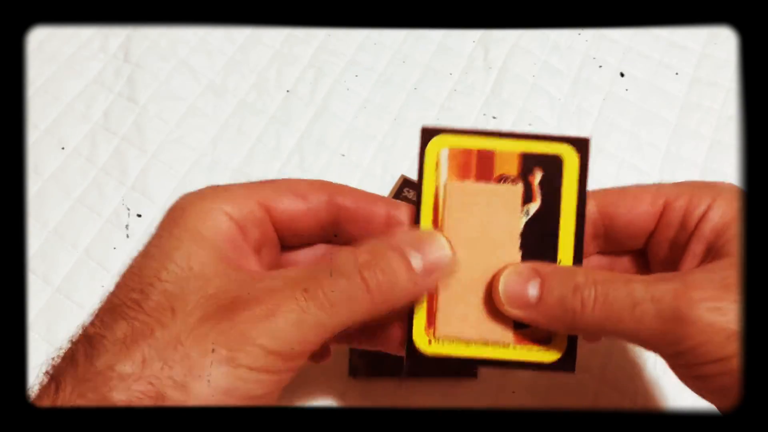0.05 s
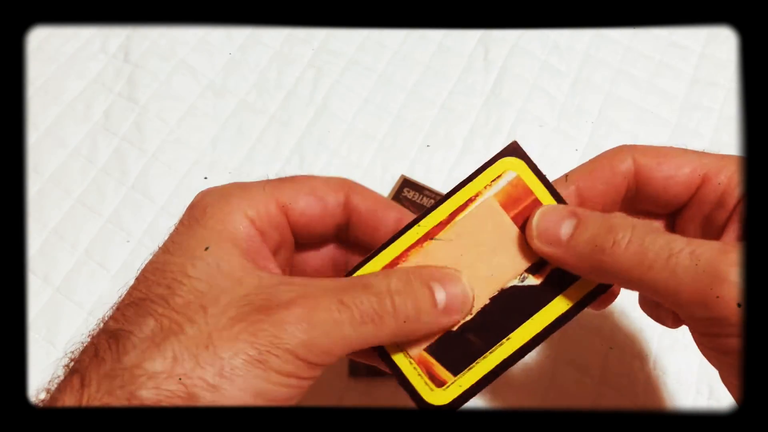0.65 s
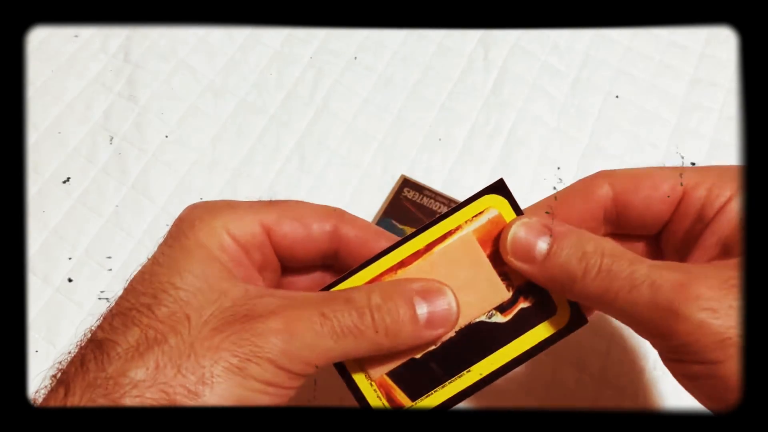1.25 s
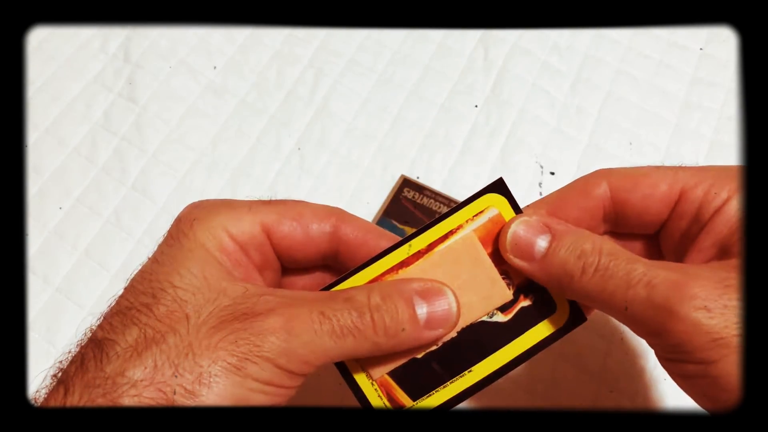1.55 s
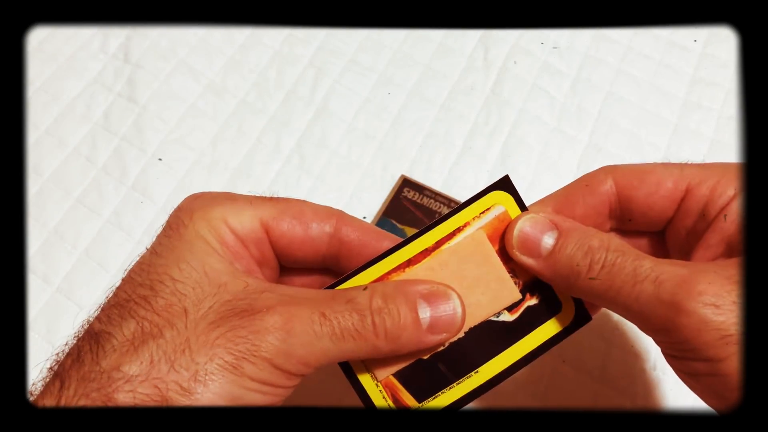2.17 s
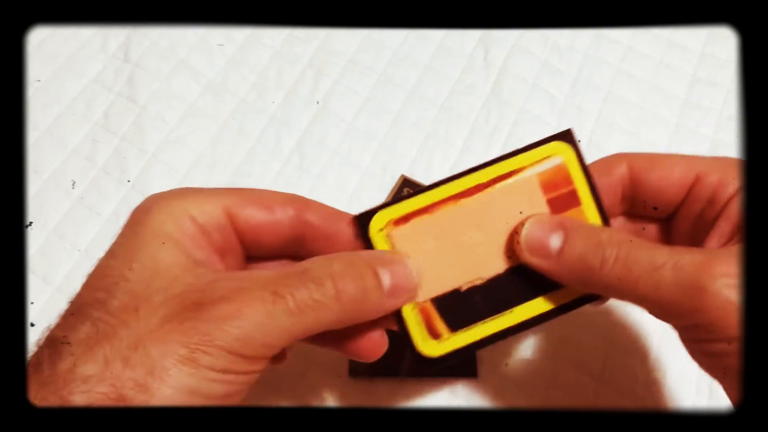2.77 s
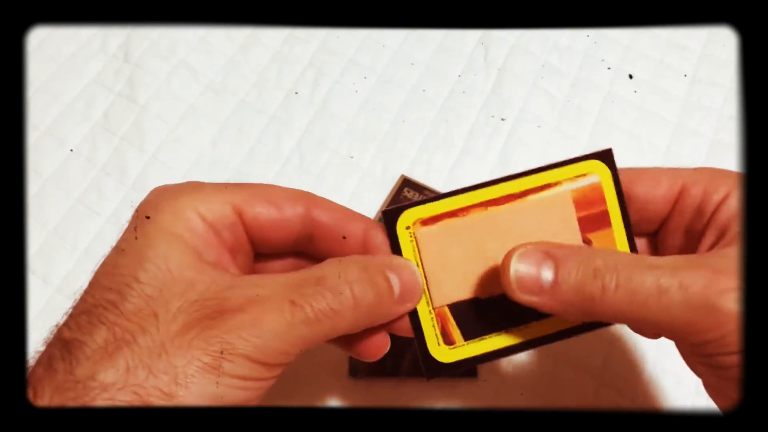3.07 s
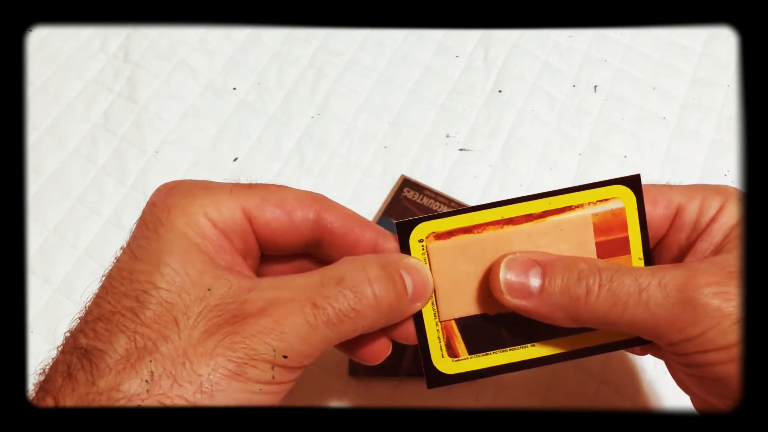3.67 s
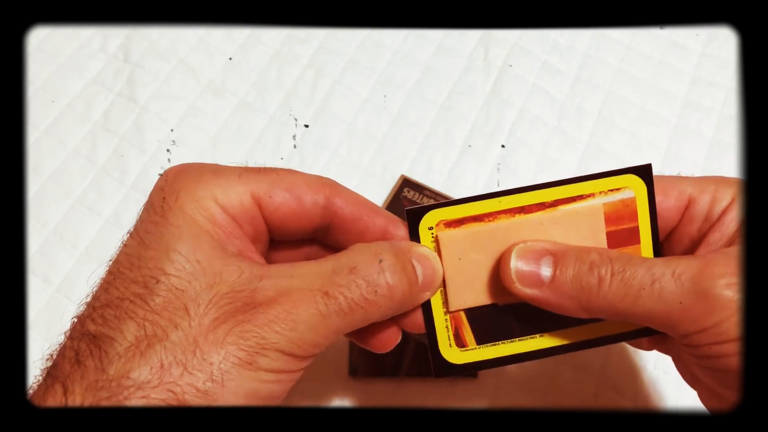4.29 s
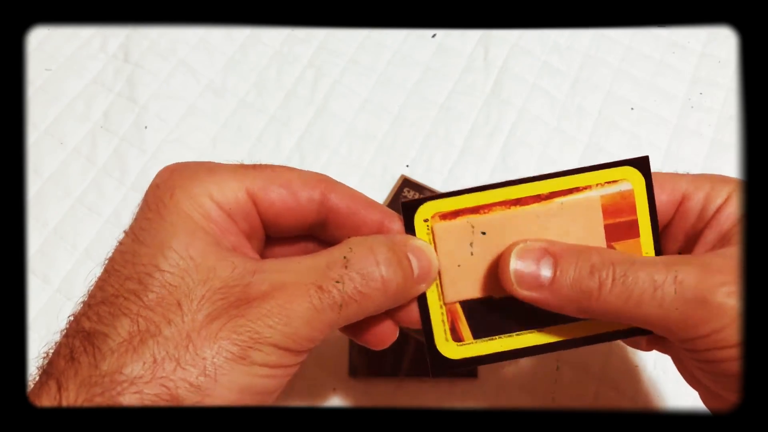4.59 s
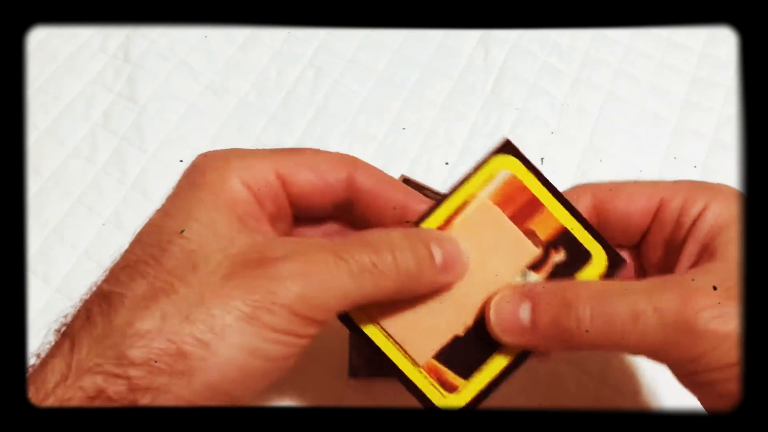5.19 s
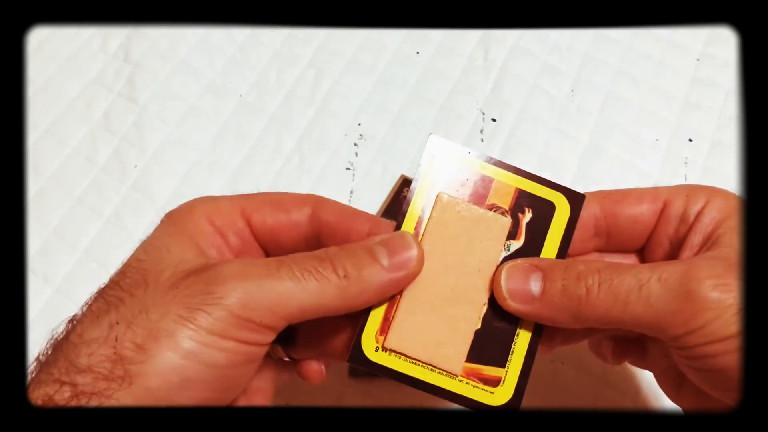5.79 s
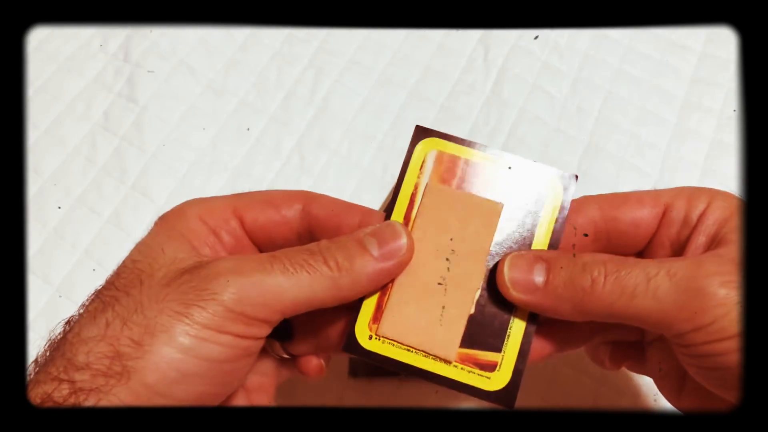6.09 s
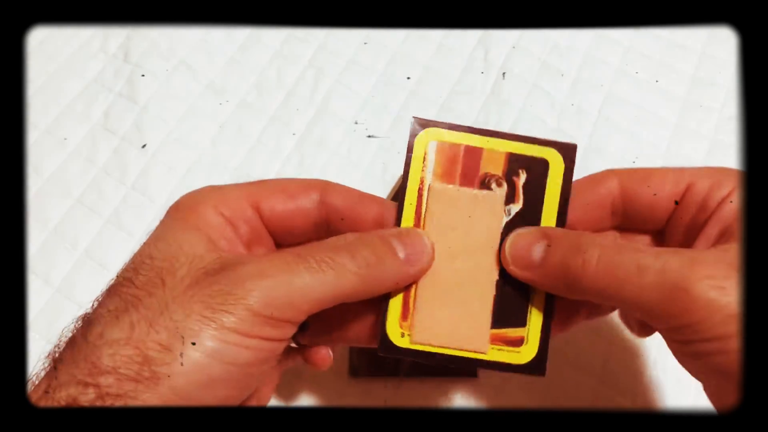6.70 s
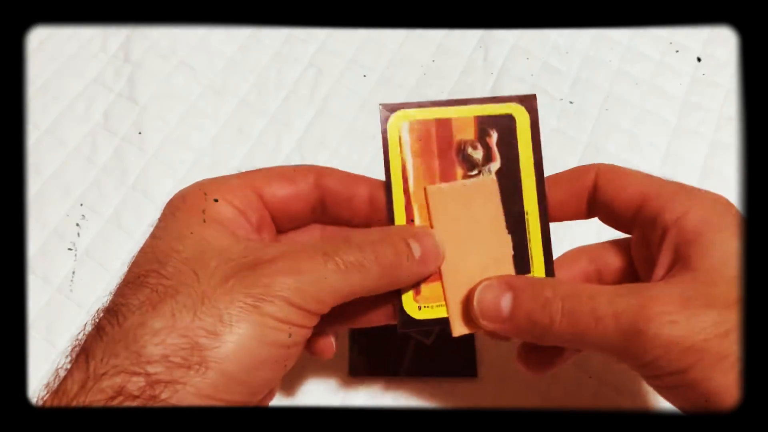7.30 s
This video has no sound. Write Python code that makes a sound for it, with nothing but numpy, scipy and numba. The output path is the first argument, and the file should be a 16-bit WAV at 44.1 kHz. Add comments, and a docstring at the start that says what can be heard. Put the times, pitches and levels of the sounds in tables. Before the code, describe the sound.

Hands work old gum loose from a stiff cardboard card, close to the microphone in a small, dry room. For the first second or so, fingers rub softly and card edges give light flicks. At 1.3 seconds comes a loud, brittle snap with a very brief ring, followed by more sharp cracks around 1.6 and 1.8 seconds. From 2 to 4 seconds there are quieter ticks and short scrapes, with a flick and rasp near 3.1. A second loud snap lands at 4 seconds. Fine crackling, clicks and dry sliding follow until about 5.5 seconds, with stronger clicks near 4.7 and 5.1. The handling then thins to tiny ticks, before soft rubbing and a few duller flicks return from 6.6 seconds to the end at about 7.5. Faint air noise and a low, wavering electrical hum lie underneath throughout.

```python
"""In a small, dry room, two hands close by bend a stiff cardboard card to work old gum loose.
The bond fails by brittle fracture, in ticks and a few loud snaps that excite the card's resonances;
a patch that comes free rings the gum like a plate. Sliding fingers rasp by stick-slip friction,
and card edges flick off them. Behind it lie faint air noise and mains hum beating against a motor."""
import sys
import numpy as np
from scipy import signal
from scipy.fft import rfft, irfft
from scipy.io import wavfile
from numba import njit

SR = 44100
rng = np.random.default_rng(int(sys.argv[2]) if len(sys.argv) > 2 else 0)


def transcribe(u):
    """Save the signal u as a 16-bit wav file named by the first command-line argument.

    u: samples, shape (n,) or (channels, n), limited to [-1, 1]; the rate is SR.
    q: integer samples, one column per channel.
    """
    v = np.clip(np.atleast_2d(u).T, -1, 1)
    q = np.round(v * 32767).astype(np.int16)
    wavfile.write(sys.argv[1], SR, q)


N = 328545

T = np.arange(N) / SR


def undb(db):
    """Decibels to gain."""
    return 10 ** (np.asarray(db) / 20)


def unit(x):
    """Scale to rms 1."""
    return x / np.sqrt(np.mean(x ** 2))


def add(out, s, x):
    """Mix x into out from time s."""
    i = max(0, int(s * SR))
    out[i:i + len(x)] += x[:max(0, N - i)]


def colour(x, points):
    """Shape x by (Hz, dB) points; rms 1."""
    hz, db = np.transpose(points)
    f = np.maximum(np.fft.rfftfreq(len(x), 1 / SR), 1)
    return unit(irfft(rfft(x) * undb(np.interp(np.log(f), np.log(hz), db)), len(x)))


def walk(rate):
    """Smooth random wander with a spread near 1."""
    knots = rng.standard_normal(int(N / SR * rate) + 2)
    return np.interp(T * rate, np.arange(len(knots)), knots)


def damping(t, t60):
    """Exponential decay: 60 dB down after t60 seconds."""
    return np.exp(-np.log(1000) * t / t60)


def flat_filter(x, hz, kind, order=2):
    """Maximally flat low-, high- or band-pass filtering."""
    return signal.sosfilt(signal.butter(order, hz, kind, fs=SR, output="sos"), x)


def band_lift(x, hz, width_hz, lift_db):
    """Second-order resonance: added to x, it lifts or cuts the band at hz."""
    b, a = signal.iirpeak(hz, hz / width_hz, fs=SR)
    return (undb(lift_db) - 1) * signal.lfilter(b, a, x)


@njit
def resonate(x, hz, q):
    """State-variable band-pass with a moving centre, gain 1 there."""
    y, b, l = np.empty(len(x)), 0., 0.
    for i in range(len(x)):
        g = np.tan(np.pi * hz[i] / SR)
        v = (b + g * (x[i] - l)) / (1 + g * (g + 1 / q))
        b, l, y[i] = 2 * v - b, l + 2 * g * v, v / q
    return y


# Spectrum of the room air. Each row: frequency in Hz, relative density in dB.
AIR_SPECTRUM = [(25, -19.5), (45, -6.5), (80, 0), (150, 2.5), (250, -1), (500, -7), (1000, -14.5),
                (2000, -23), (4000, -25.5), (8000, -27.5), (15600, -31.5), (16500, -52.5)]

def air(level_db=-67):
    """Broadband ambient noise: a soft rumble and hiss whose level wavers slightly."""
    return colour(rng.standard_normal(N), AIR_SPECTRUM) * undb(level_db + .6 * walk(4.3))


# Course of the mains fundamental. Each row: time in seconds, level in dB.
MAINS_LEVELS = [(0, -77), (1.33, -69), (2.94, -73.5), (3.36, -81.5), (4.1, -70.5), (5.5, -74), (5.8, -77),
                (6.55, -88.5), (7.16, -70)]
# Faint hum tones and a thin electronic whine. Each row: frequency in Hz, mean level in dB.
STEADY_TONES = [(149, -82), (179.6, -86), (239.5, -81.5), (14655, -82)]

def hum(mains_hz=59.2, buzz_hz=120, motor_hz=118.26, buzz_db=-63, motor_db=-70.5, quiet_s=.47):
    """Beating: a motor runs just below the mains buzz, so their sum swells and sinks."""
    beat = tone(buzz_hz, buzz_db, quiet_s) - tone(motor_hz, motor_db, quiet_s)
    fundamental = tone(mains_hz, np.interp(T, *np.transpose(MAINS_LEVELS)))
    return beat + fundamental + sum(tone(hz, db + 1.5 * walk(8)) for hz, db in STEADY_TONES)


def tone(hz, db, zero_s=0):
    """A sine of the given rms level that crosses zero upwards at zero_s."""
    return np.sqrt(2) * undb(db) * np.sin(2 * np.pi * hz * (T - zero_s))


def room(x, wet_db=-22, gap_s=.0105, build_s=.0035, bright_t60=.15, dull_t60=.3):
    """Reverberation: near walls answer after a gap and absorb treble, so the lows last longest."""
    t = np.arange(SR // 3) / SR
    bright, dull = rng.standard_normal((2, len(t)))
    bright = flat_filter(bright, 13500, "low") * damping(t, bright_t60)
    dull = undb(-3) * flat_filter(dull, 2200, "low") * damping(t, dull_t60)
    tail = (bright + dull) * np.clip((t - gap_s) / build_s, 0, 1)
    return undb(wet_db) * signal.fftconvolve(x, tail / np.sqrt(np.sum(tail ** 2)))[:N]


# Finger strokes. Each row: start, attack and release in seconds, rasp level in dB,
# body and hiss in dB relative to the rasp.
FINGER_STROKES = [(0, 0.0032, 0.036, -59, -3.5, 6.5), (.16, 0.016, 0.047, -71.5, 2, 6),
                  (.19, 0.022, 0.28, -69.5, -9, -3.5), (0.351, 0.049, 0.11, -57, -9, -8.5),
                  (0.518, 0.028, 0.24, -60.5, -4.5, -11), (.63, 0.039, 0.17, -64, -18, -1),
                  (0.831, 0.034, 0.011, -64, -6, -5), (.91, 0.074, .04, -68.5, -12, -7),
                  (2.39, 0.042, 0.023, -66.5, -0.5, 3.5), (2.608, 0.0077, 0.034, -62.5, 5.5, -12),
                  (2.644, 0.015, 0.057, -66, -11, -4), (2.718, 0.023, 0.12, -66.5, -10, 5),
                  (2.74, 0.063, 0.027, -57.5, -9, -4), (2.88, 0.11, 0.17, -63.5, -7.5, -6),
                  (3.099, .018, 0.016, -48, -5.5, -8), (3.15, 0.014, .018, -55.5, -10, -5),
                  (3.2, 0.023, 0.021, -65.5, -6, -4), (3.53, 0.017, 0.068, -64, -1.5, -16),
                  (3.68, 0.015, 0.06, -64, -1, -7), (4.099, 0.036, 0.011, -58, 5, 4.5),
                  (4.682, 0.018, 0.019, -46, -10, -14), (4.769, 0.096, 0.017, -59.5, -4.5, -2),
                  (5.065, 0.043, 0.039, -60, -9, 2), (5.14, 0.034, 0.062, -53.5, -13, -3),
                  (5.23, 0.024, 0.018, -62.5, -8, -5), (5.32, .16, .03, -63, -9, 2),
                  (5.9, 0.16, 0.046, -69, -4, -5), (6.51, 0.058, .05, -79, 7, 3.5),
                  (6.63, 0.065, 0.1, -58, 0, -6), (6.73, 0.031, 0.08, -62, 2, -8),
                  (6.918, 0.08, 0.072, -63.5, -6, -1.5), (7.108, .012, 0.028, -62, 4.5, 2),
                  (7.134, 0.018, 0.21, -65, 5, -2.5), (7.25, 0.046, 0.15, -61, 5.5, -5),
                  (7.32, 0.045, 0.14, -56, 3, -5)]

def stroke_gains(speed_exponent=1.1, rest_db=(-86, -91, -92)):
    """Friction noise grows with speed: gains of body, rasp and hiss over the creep of resting fingers."""
    power = np.zeros((3, N))
    for start, attack, release, db, body_db, hiss_db in FINGER_STROKES:
        t = np.arange(int((attack + release) * SR)) / SR
        speed = np.interp(t, [0, attack, attack + release], [0, 1, 0])
        for part, part_db in zip(power, (body_db, 0, hiss_db)):
            add(part, start, (undb(db + part_db) * speed ** speed_exponent) ** 2)
    return np.sqrt(power + undb(rest_db)[:, None] ** 2)


# Low, middle and high friction spectra. Each row: frequency in Hz, relative level in dB.
BODY_SPECTRUM = [(150, -25.5), (350, -1.5), (650, 2.5), (1200, 3), (2000, -2), (2800, -19.5)]
RASP_SPECTRUM = [(1500, -28.5), (2300, 1.5), (3600, 2.5), (5500, 0.5), (6800, -5), (8500, -23.5)]
HISS_SPECTRUM = [(5500, -21.5), (7200, 1.5), (10000, 1.5), (14000, -3), (15500, 1), (16100, -34)]
# The two card resonances that the grip selects.
# Each row: time in seconds, lower and upper frequency in Hz, nominal lift in dB.
GRIP_RESONANCES = [(.22, 3300, 5400, 9), (.43, 3170, 5230, 3), (.6, 3280, 3900, 6),
                   (0.701, 4200, 5810, 6.5), (2.76, 3130, 5960, 7), (2.93, 2970, 5340, 11.5),
                   (3.04, 2820, 5340, 7.5), (3.1, 2960, 5100, 1.5), (4.85, 3770, 4737, 9.5),
                   (5.18, 3520, 4280, 2), (6.7, 2660, 3550, 6), (7, 3740, 5970, 6.5), (7.12, 720, 3420, 10),
                   (7.24, 750, 3540, 6), (7.29, 1570, 3280, 11), (7.44, 1700, 3160, 10)]

def rubbing(slips_per_s=3000, grain_db=6.5, judder_db=3, flicker_db=1.5, q=7.0):
    """Stick-slip friction: skin ridges catch and slip in micro-clicks, juddering with the pressure."""
    slips = (rng.random(N) < slips_per_s / SR) * rng.choice([-1, 1], N)
    sizes = undb(grain_db * np.minimum(rng.exponential(size=N), 5))
    friction = unit(slips * sizes) + rng.standard_normal(N)
    judder = judder_db * walk(90)
    rub = np.zeros(N)
    for spectrum, gain in zip((BODY_SPECTRUM, RASP_SPECTRUM, HISS_SPECTRUM), stroke_gains()):
        rub += colour(friction, spectrum) * gain * undb(judder + flicker_db * walk(70))
    grip_s, *columns = np.transpose(GRIP_RESONANCES)
    lower_hz, upper_hz, lift_db = (np.interp(T, grip_s, column) for column in columns)
    lower = (undb(lift_db) - 1) * resonate(rub, lower_hz, q)
    upper = (undb(lift_db + 1.5) - 1) * resonate(rub, upper_hz, q)
    # what goes into the resonances is missing from the rasp around them
    spent = .39 * resonate(rub, np.sqrt(lower_hz * upper_hz), .52)
    return rub - spent + .51 * (lower + upper)


# Resonances and dead spots of the held card. Each row: frequency in Hz, width in Hz, full lift in dB.
CARD_RESONANCES = [(716, 530, 6.5), (1230, 89, 2.5), (2120, 310, 7), (2930, 140, -11), (3260, 350, 2.5),
                   (4220, 410, 2), (5040, 710, 1.5), (6584, 310, 6.5), (8060, 270, -12), (10200, 900, 1),
                   (14700, 500, 6), (15160, 500, 6.5)]

def card(x, depth=1):
    """Forced vibration: the card imposes its peaks and dips on whatever shakes it."""
    return x + sum(band_lift(x, hz, width, db * depth) for hz, width, db in CARD_RESONANCES)


# Spells of crackle as the card bends.
# Each row: start and end in seconds, ticks per second, base level in dB.
CRACKLE_SPELLS = [(0.81, 1.024, 30, -72), (1.963, 2.041, 40, -59), (2.412, 2.463, 50, -51),
                  (3.049, 3.312, 30, -60.5), (3.487, 3.542, 40, -56.5), (3.817, 4.02, 20, -66.5),
                  (4.296, 4.43, 75, -49.5), (4.473, 4.591, 60, -50), (4.763, 4.896, 45, -50.5),
                  (5.237, 5.493, 30, -54.5), (5.944, 6.049, 40, -52.5), (6.539, 6.794, 35, -59),
                  (7.112, 7.442, 45, -60)]

def crackle(t60=.005, scatter_db=3):
    """Acoustic emission: tiny threads of the bond part in turn, each a short tick through the card."""
    out, t = np.zeros(N), np.arange(SR // 100) / SR
    for start, end, rate, db in CRACKLE_SPELLS:
        count = max(1, int((end - start) * rate))
        for k, (jitter, size) in enumerate(rng.random((count, 2))):
            tick = rng.standard_normal(len(t)) * damping(t, t60)
            gain = undb(db + scatter_db * (2.87 * size - .5))
            add(out, start + (end - start) * (k + jitter) / count, gain * tick)
    return card(flat_filter(out, 4000, "high"), depth=.69)


def flex(drive_db, hz=340, swell_s=.00091):
    """Damped oscillation: the whole card springs back and the fingers stop it within a few cycles."""
    t = np.arange(SR // 25) / SR
    share_db = -8 - .25 * abs(drive_db + 30)  # the share peaks for hard snaps, at a drive of -30 dB
    envelope = t / swell_s * np.exp(1 - t / swell_s)
    swing = undb(drive_db + share_db) * np.sin(2 * np.pi * hz * t) * envelope
    return flat_filter(swing, 170, "high")  # no deep rumble lingers below the spring


# Bands of a snap, from the card's body up to the sharp edge. Each row: lower and upper limit in Hz.
WAVE_BANDS = [(540, 1450), (1500, 3300), (3300, 5600), (5600, 8500), (8500, 16500)]

def snap(t60, levels_db, crack_t60=.00055, crack_db=5, bass_lag_s=.0005, kick_db=3):
    """Dispersion: a sudden release flexes the card; its slow, low bending waves come late and linger."""
    t = np.arange(SR // 25) / SR
    out = flex(levels_db[0])
    for (low_hz, high_hz), db in zip(WAVE_BANDS, levels_db):
        slowness = WAVE_BANDS[0][1] / high_hz
        age = t - bass_lag_s * slowness
        ring = damping(age, t60 * (1 + .99 * slowness))
        crack = undb(crack_db) * damping(age, crack_t60)
        shake = rng.choice([-1, 1], len(t)) * (age >= 0) * (ring + crack)
        # to long waves the whole release is a single kick
        shake[np.argmax(age >= 0)] += undb(kick_db) * np.sqrt(slowness * np.sum(shake ** 2))
        wave = card(flat_filter(shake, (low_hz, high_hz), "band", order=3))
        millisecond_rms = np.sqrt(np.sum(wave ** 2) / (SR / 1000))  # as if all energy fell in 1 ms
        out += undb(db) * wave / millisecond_rms
    return out


# Spectrum shared by all flicks. Each entry: relative level in dB in one of WAVE_BANDS.
FLICK_SPECTRUM = [-3, -1.5, 0.5, -5.5, 2.5]
# Edge flicks. Each row: start in seconds, base t60 in seconds, base level in dB, tilt in dB per band.
EDGE_FLICKS = [(.0045, 0.0043, -41, 0), (0.1855, 0.016, -48.5, -2.5), (.6509, 0.01, -46.5, 0),
               (0.7877, .024, -51.5, 0), (0.9835, .005, -58.5, 0.5), (1.0006, 0.011, -54.5, 0.5),
               (1.065, 0.0057, -45, -0.5), (1.1497, 0.0079, -47.5, 0), (1.175, .013, -48.5, 0.5),
               (2.4237, 0.024, -66, 4), (2.481, 0.0095, -61, 2), (2.6101, 0.027, -54.5, 0.5),
               (3.0765, .009, -56.5, 0), (3.1082, 0.037, -44.5, -0.5), (3.16, .017, -61, 0),
               (4.5696, 0.0075, -56, 0), (4.6248, 0.0044, -57.5, -0.5), (4.694, .025, -50.5, 0),
               (4.7, 0.039, -44.5, 0.5), (4.7271, .0058, -47, 2.5), (4.8384, 0.0085, -45.5, -1.5),
               (5.1494, 0.012, -43.5, 3.5), (5.1624, 0.0033, -52, 1.5), (5.31, 0.0065, -43, .5),
               (5.342, 0.025, -57, -4), (5.436, 0.012, -59, 0), (6.6322, 0.0078, -58.5, -0.5),
               (6.6625, 0.012, -56.5, -1), (6.7627, 0.044, -52, -5), (6.789, 0.015, -61, -6.5),
               (7.28, .015, -53.5, -2), (7.307, 0.015, -50, -2.5), (7.3755, .0057, -44.5, -3.5)]

def flicks(ping_hz=4600, ping_width_hz=800):
    """Plucking: a card edge slips off a nail with a bright ping, or dully off a soft fingertip."""
    out = np.zeros(N)
    from_middle = np.arange(len(WAVE_BANDS)) - len(WAVE_BANDS) // 2
    for start, t60, db, tilt_db in EDGE_FLICKS:
        flick = snap(t60, db + np.array(FLICK_SPECTRUM) + tilt_db * from_middle)
        ping = band_lift(flick, ping_hz, ping_width_hz, lift_db=6 + 2.8 * tilt_db)
        add(out, start, flick + ping)
    return out


# Modes of the gum. Each row: frequency in Hz, relative level in dB, t60 in seconds.
GUM_MODES = [(1860, 2, .018), (2078, -4, 0.014), (2110, -22, .09), (3150, -11.5, 0.0068), (3370, -23, .08)]
# Whole patches of gum coming free. Each row: start in seconds, base level in dB.
PATCH_RELEASES = [(1.3011, -27), (4.0248, -29)]

def gum(attack_s=.00074):
    """Free vibration: the brittle stick rings like a small plate when a patch of it is released."""
    out, t = np.zeros(N), np.arange(SR // 8) / SR
    attack = np.minimum(t / attack_s, 1)
    for start, db in PATCH_RELEASES:
        for hz, mode_db, t60 in GUM_MODES:
            ring = np.sin(2 * np.pi * (hz * t + rng.random())) * damping(t, t60)
            add(out, start, undb(db + mode_db) * ring * attack)
    return out


# Cracks in the bond under the gum. Each row: start in seconds, base t60 in seconds, base level in dB,
# card body and sharp edge in dB relative to that level.
BOND_CRACKS = [(0.5251, 0.0081, -43, -15, 3.5), (1.301, 0.016, -25.5, -5.5, 14.5),
               (1.3039, .0065, -29.5, -3.5, 11), (1.6331, 0.0074, -49, -5, 11),
               (1.6422, 0.0049, -37, -7, 11.5), (1.6461, 0.0098, -24, -2.5, 8),
               (1.6565, .007, -40, -19, -1), (1.7999, 0.014, -32, -10, 6.5),
               (1.818, 0.0061, -29.5, -9.5, -1.5), (1.9424, 0.0053, -55, -20.5, 3),
               (1.9613, .005, -58, -17, 11.5), (2.1239, 0.0057, -44, -11.5, 2),
               (2.8518, 0.0044, -62.5, -2, 16), (3.4746, 0.0028, -64.5, -2.5, 24),
               (3.5366, 0.0056, -51, -9, 22.5), (3.6829, 0.0057, -54.5, -9, 18.5),
               (4.0242, 0.0082, -31.5, -21, 16), (4.0253, 0.016, -22.5, -7.5, 12.5),
               (4.1347, 0.0036, -41, -3.5, 6.5), (4.3653, 0.0072, -42.5, -5, 0), (4.408, 0.01, -53, -17, 4),
               (4.5399, 0.0067, -54.5, -6, 10), (4.7088, 0.012, -38.5, -5.5, 12),
               (5.1035, 0.0048, -45.5, -11, 8), (5.4198, 0.0058, -40.5, -26, 3.5),
               (5.8413, 0.0018, -63.5, -1, 14.5), (6.0708, 0.0053, -67, -8, 12.5),
               (6.164, 0.0038, -61, -9, 8.5), (6.2996, 0.0058, -57.5, -11.5, 7)]

def cracks():
    """Brittle fracture: the bond gives way with a snap that rattles and flexes the card."""
    out = np.zeros(N)
    for start, t60, db, body_db, edge_db in BOND_CRACKS:
        hollow_db = -13 + .53 * edge_db  # a sharper fracture fills the dip above the card's body
        spectrum_db = np.array([body_db, hollow_db, -3, 2, edge_db])
        add(out, start, snap(t60, db + spectrum_db))
    return out


def scene():
    """Superposition: the direct sound of the handling, its reverberation and the background."""
    hands = cracks() + gum() + flicks() + crackle() + rubbing()
    return (hands + room(hands) + hum() + air())[None]


def record(dry, top_hz=16300):
    """Band limiting: a steep low-pass removes the highest treble."""
    return signal.sosfilt(signal.ellip(8, .2, 70, top_hz, fs=SR, output="sos"), dry)


dry = scene()
out = record(dry)
transcribe(out)
```